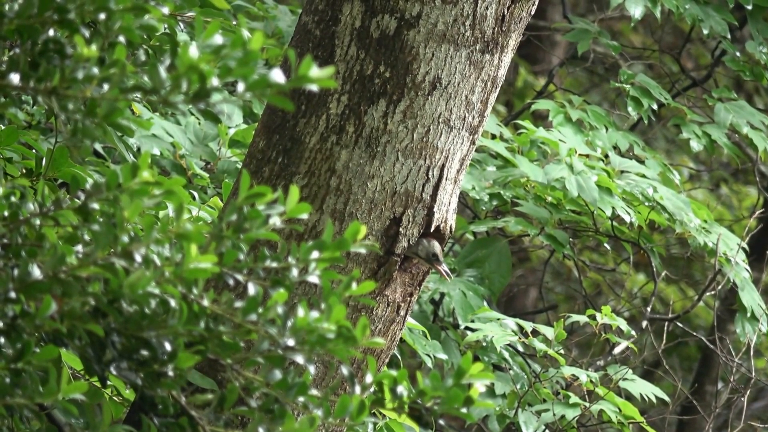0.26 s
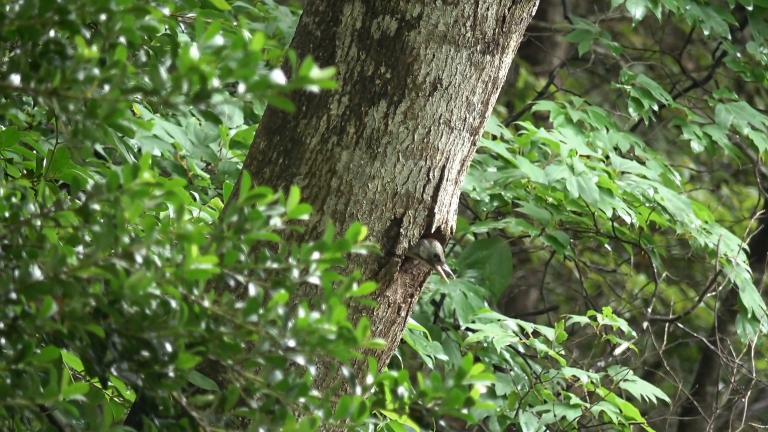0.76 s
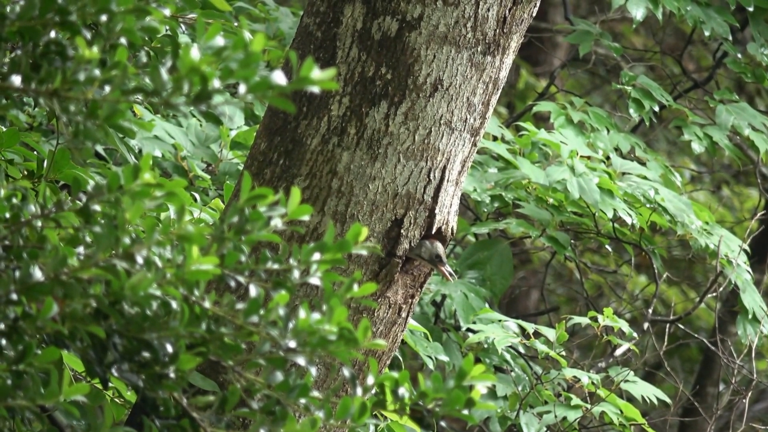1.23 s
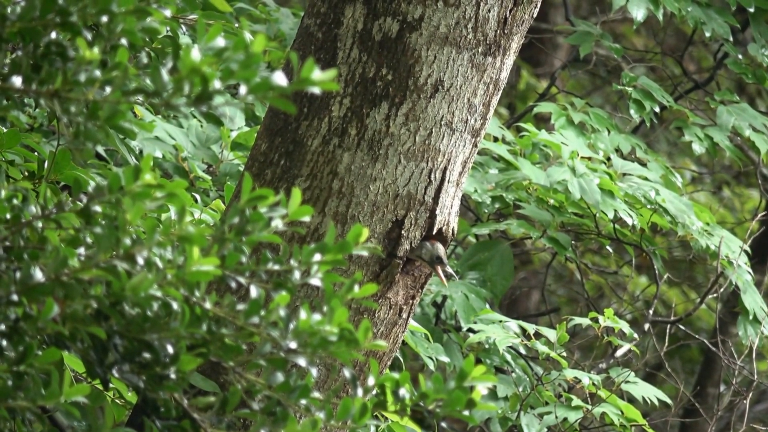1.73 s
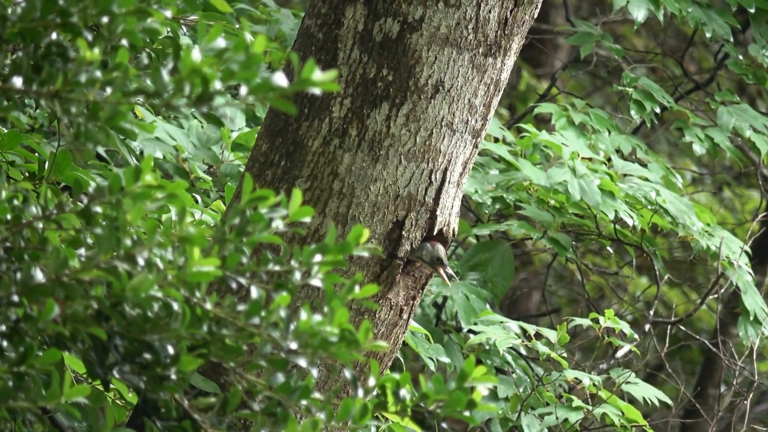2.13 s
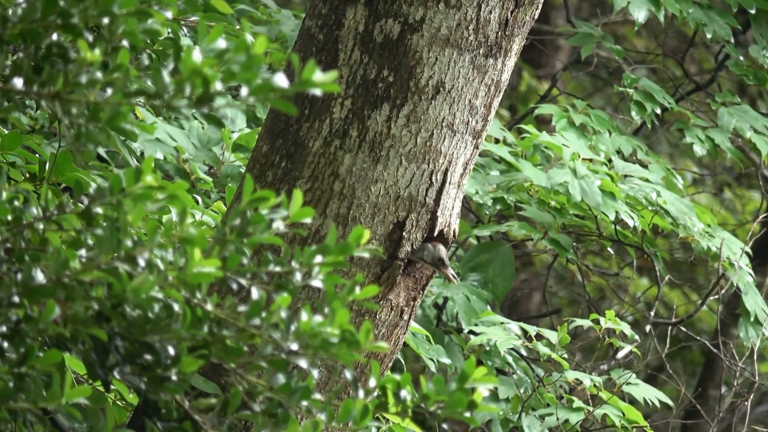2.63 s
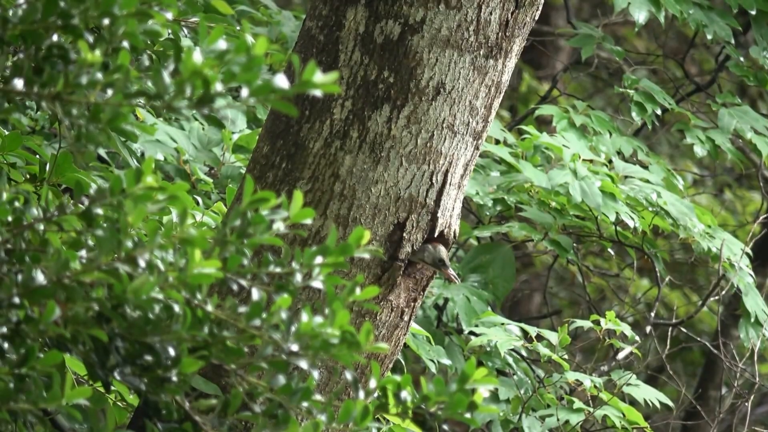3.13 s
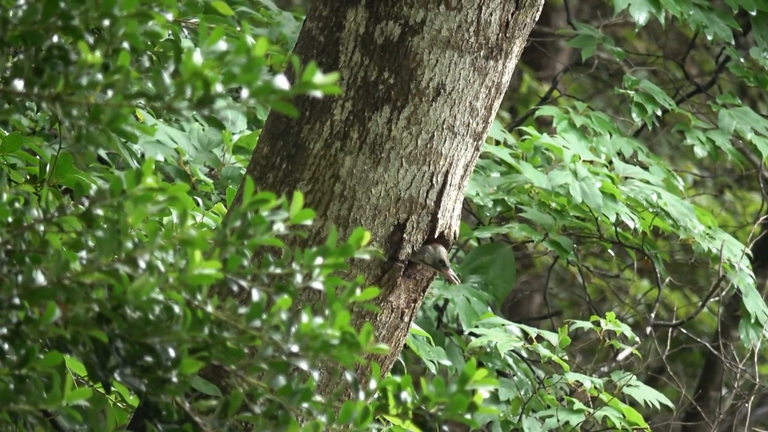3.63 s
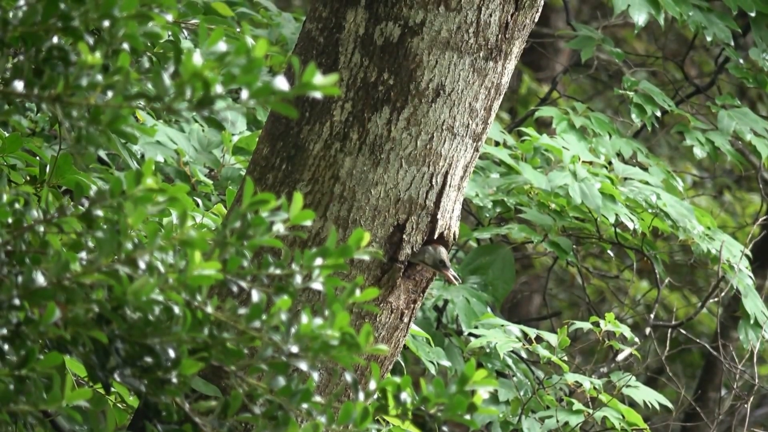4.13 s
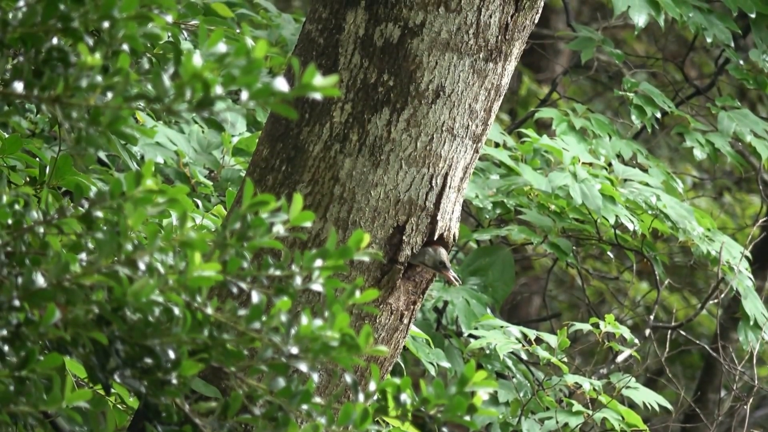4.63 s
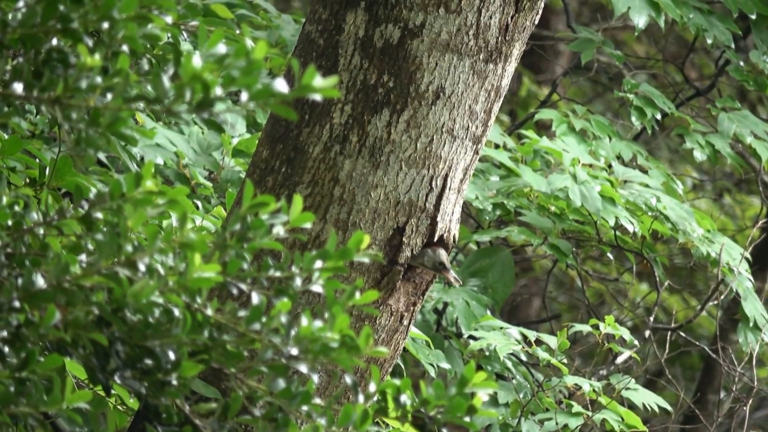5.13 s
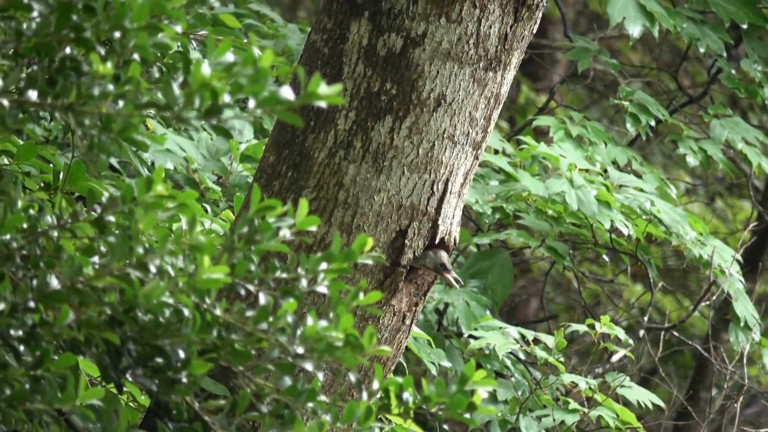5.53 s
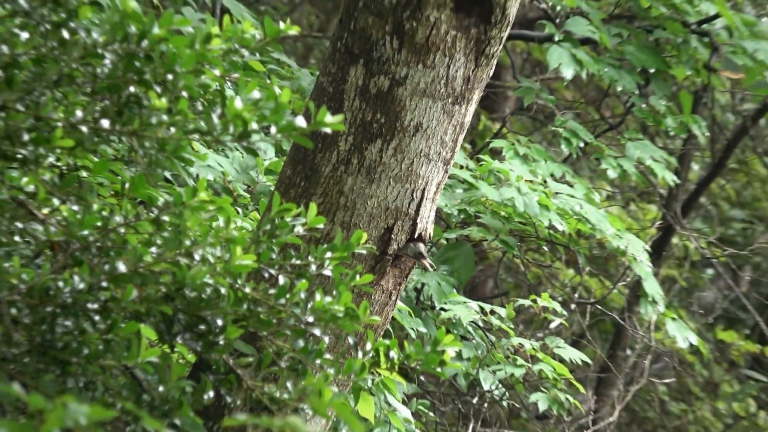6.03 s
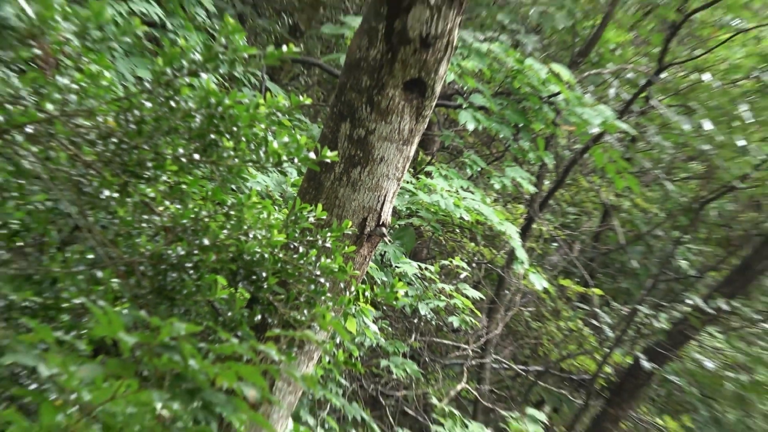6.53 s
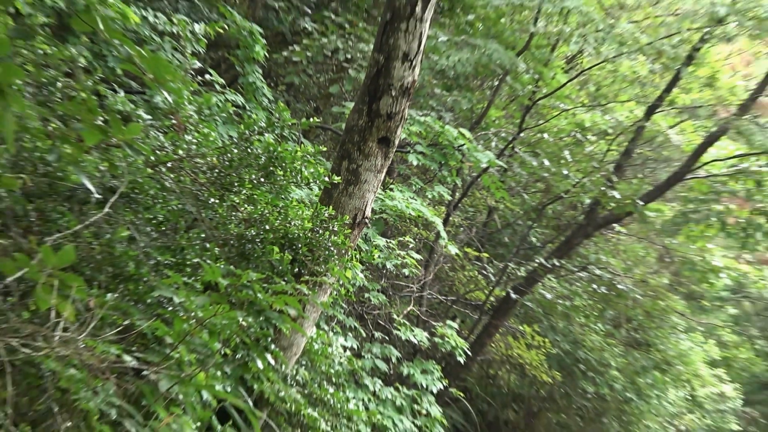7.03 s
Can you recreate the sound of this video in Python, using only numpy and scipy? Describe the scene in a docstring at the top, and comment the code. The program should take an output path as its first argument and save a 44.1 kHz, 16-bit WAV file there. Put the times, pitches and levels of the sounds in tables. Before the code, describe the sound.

Nestling birds keep up a nasal, rasping chatter with soft hisses and faint clucks over quiet forest air, broken once by a sharp pik.

```python
"""A woodpecker nest in a forest, nearly straight ahead of a closely spaced microphone pair.
Over quiet air and a thin far-off whistle, short nasal rasping calls start at once, about three a second,
with soft hisses and faint clucks between them; trunks and leaves scatter every call.
Near 3 s comes one sharp high 'pik'. The calls carry on, joined by soft bumps on the camera body,
two more far whistles and three faint runs of the lens motor."""
import sys
import numpy as np
from scipy import signal
from scipy.fft import rfft, irfft, next_fast_len
from scipy.io import wavfile

SR = 44100
rng = np.random.default_rng(int(sys.argv[2]) if len(sys.argv) > 2 else 0)


def file_out(sig):
    """Save sig as 16-bit WAV at sys.argv[1]."""
    # one column per channel
    cols = np.atleast_2d(sig).T
    # limit, then scale
    lim = np.clip(cols, -1, 1)
    pcm = np.round(lim * 32767).astype(np.int16)
    wavfile.write(sys.argv[1], SR, pcm)


N = 320607
CUTOFF_HZ = 15900
# arch of a call or cluck, before roughness scales it: length_share, pitch_ratio, effort_db
CALL_ARCH = [(0, 0.929, 5), (.1, 0.94, -2.5), (.33, 0.97, 2.5), (.52, 0.98, 4.5), (0.721, .935, -2.5),
             (.86, .82, -3.5), (0.999, .74, -10.5), (1.179, .65, -5.5)]


def from_db(db):
    """Decibels to gain."""
    return 10 ** (np.asarray(db) / 20)


def rms_one(x):
    """Scale to rms 1."""
    return x / np.sqrt(np.mean(x ** 2) + 1e-20)


def at_hz(points, hz, column=1):
    """Read a column of a spectrum on a log-frequency axis."""
    points = np.array(points)
    return np.interp(np.log(np.maximum(hz, 1)), np.log(points[:, 0]), points[:, column])


def along(rows, t):
    """Read every column of a curve at t."""
    first, *columns = np.transpose(rows)
    return [np.interp(t, first, c) for c in columns]


def coloured_noise(colour):
    """Steady noise of a given spectrum, rms 1."""
    size = next_fast_len(N)
    gain = from_db(at_hz(colour, np.fft.rfftfreq(size, 1 / SR)))
    return rms_one(irfft(rfft(rng.standard_normal(size)) * gain, size)[:N])


def flutter(rate_hz, size):
    """Random wavering up to a given rate, rms 1."""
    low = signal.butter(2, min(rate_hz, SR / 4), fs=SR, output="sos")
    return rms_one(signal.sosfilt(low, rng.standard_normal(2 * size))[size:])


def add(track, start_s, sound):
    """Mix a sound into a track at a given time."""
    start = int(start_s * SR)
    track[start:start + len(sound)] += sound[:N - start]


def swells(events, colour):
    """Noise of one colour that rises and falls smoothly at each event."""
    level = np.zeros(N)
    for start_s, length_s, level_db in events:
        add(level, start_s, from_db(level_db) * np.hanning(int(length_s * SR)))
    return level * coloured_noise(colour)


def forest_air(air_db=-56, leaves_db=-67, stir_db=4, stir_hz=7, rumble_trim_db=-1.0):
    """The bed of the place: even hiss, leaves stirring in small fits and a low distant rumble."""
    # spectra of the air, the leaves and the rumble: frequency_hz, gain_db
    air_colour = [(15, -36), (25, -2), (84, 0), (180, -9), (326, -11.5), (796, -8.5), (1160, -2.5),
                  (1890, -5), (3250, -5), (3720, -6.5), (5570, -11), (9070, -31), (12200, -21),
                  (14800, -38), (16000, -53)]
    leaf_colour = [(250, -17), (420, -20), (530, 11.5), (700, -2), (1050, 13.5), (1500, -16), (2200, -3),
                   (3500, -44), (16000, -48)]
    rumble_colour = [(20, -37), (45, -5.5), (75, 0.5), (120, -2.5), (170, -21), (300, -31)]
    # drift of the rumble, before its trim: time_s, level_db
    rumble_drift = [(0.0, -61.5), (0.95, -71), (2.91, -58), (7.11, -63), (7.27, -60)]
    rumble_db, = along(rumble_drift, np.arange(N) / SR)
    leaves = from_db(leaves_db + stir_db * flutter(stir_hz, N)) * coloured_noise(leaf_colour)
    rumble = from_db(rumble_db + rumble_trim_db) * coloured_noise(rumble_colour)
    return from_db(air_db) * coloured_noise(air_colour) + leaves + rumble


def far_whistles():
    """Thin whistles far off: swells of a narrow, high band of noise."""
    # whistles: start_s, length_s, level_db
    whistles = [(0.0, 0.19, -65), (3.96, 0.17, -64), (6.87, 0.21, -72)]
    # their band: frequency_hz, gain_db
    whistle_colour = [(6000, -70), (7300, -12), (7700, -10), (8100, -23), (9500, -70)]
    return swells(whistles, whistle_colour)


def camera_bumps():
    """Soft, dull bumps on the camera body."""
    # bumps: start_s, length_s, level_db
    bumps = [(3.325, 0.042, -57.5), (4.14, 0.057, -51.5), (5.12, .12, -59.5)]
    # their spectrum: frequency_hz, gain_db
    bump_colour = [(40, -18), (130, 7), (300, 5.5), (550, 12), (800, -4), (2000, -35), (16000, -70)]
    return swells(bumps, bump_colour)


def lens_motor(cruise_hz=148.4, settle_s=0.0545, brake_s=0.101, kick_db=9, waver=0.0059):
    """A faint two-partial hum: the motor starts fast and loud, settles, then sags as it brakes."""
    # motor runs: start_s, length_s, fundamental_db, octave_db, overshoot_share, sag_share
    runs = [(4.16, 0.38, -67, -66.5, 0.148, 0.18), (5.62, 0.37, -58.5, -73.5, 0.41, 0.21),
            (6.24, 1, -66, -69, 0.277, 0.0071)]
    out = np.zeros(N)
    for start_s, length_s, fundamental_db, octave_db, overshoot, sag in runs:
        t = np.arange(int(length_s * SR)) / SR
        kick, brake = np.exp(-t / settle_s), np.exp((t - length_s) / brake_s)
        hz = cruise_hz * (1 + overshoot * kick - sag * brake)
        hz *= 1 + waver * flutter(rate_hz=25, size=65536)[:len(t)]
        phase = 2 * np.pi * np.cumsum(hz) / SR
        hum = from_db(fundamental_db + kick_db * kick) * np.sin(phase)
        hum += from_db(octave_db) * np.sin(2 * phase)
        add(out, start_s, np.sqrt(2) * hum * signal.windows.tukey(len(t), .1))
    return out


def through_trees(voice, direct, build_up_s=0.0066, far_db=-23, far_t60_s=1.35):
    """From nest to microphone: direct sound, hard echoes, then leaf scatter with a faint long tail."""
    # echoes off nearby trunks and ground, against the direct sound: delay_s, gain_db
    echoes = [(.0068, -15), (.0125, -13), (.0215, -15), (.044, -14.5)]
    # scatter from the foliage: frequency_hz, gain_db, t60_s
    foliage = [(500, -32, 0.88), (1590, -14, 0.44), (2530, -10, 0.66), (3136, -4, 0.31), (4370, -3, 0.4),
               (8350, -1, 0.42), (16000, -2.5, 0.33)]
    t = np.arange(SR) / SR
    hz = np.fft.rfftfreq(SR, 1 / SR)
    white = rfft(rng.standard_normal(SR)) / np.sqrt(SR)
    centres = np.geomspace(400, 16000, 12)
    far_tail = from_db(far_db) * 1000 ** (-t / far_t60_s)
    build_up = 1 - np.exp(-t / build_up_s)
    response = np.zeros(SR)
    for centre, share in zip(centres, np.eye(len(centres))):
        band = irfft(white * np.interp(np.log(hz + 1), np.log(centres), share), SR)
        t60_s = at_hz(foliage, centre, column=2)
        decay = (1000 ** (-t / t60_s) + far_tail) * build_up
        response += band * rms_one(decay) * from_db(at_hz(foliage, centre))
    response[0] += direct
    for delay_s, gain_db in echoes:
        response[int(delay_s * SR)] += direct * from_db(gain_db)
    return signal.fftconvolve(voice, response)[:N]


def hisses(length_s=0.08):
    """Soft puffs of hiss from the nest, all equally long."""
    # puffs: middle_s, level_db
    puffs = [(.195, -43), (.68, -49.5), (.97, -44.5), (1.245, -42.5), (1.648, -49.5), (2.22, -53),
             (3.316, -46), (3.919, -45.5), (4.633, -48), (5.64, -45.5), (5.956, -43.5), (6.692, -37.5)]
    # their spectrum: frequency_hz, gain_db
    hiss_colour = [(300, -40), (550, 10.5), (720, -6), (1000, 10), (1500, 5), (2250, 9.5), (2800, 6.5),
                   (3800, -5), (4400, 12), (4900, 1), (5750, 11.5), (6700, -3.5), (9000, -18), (16000, -27)]
    return swells([(middle_s - length_s / 2, length_s, db) for middle_s, db in puffs], hiss_colour)


def syrinx(length_s, pitch_hz, rough, arch, colour, fade=0, start_ratio=1, breath=0.03, attack_s=0.0028,
           scoop_s=0.0069, bloom_s=0.00028, wander=0.0054, jitter=0.066, rasp=0.75, size=2600):
    """The bird's voice: harmonics on an arched pitch; rough calls waver from cycle to cycle."""
    t = np.arange(size) / SR
    bend, effort = along(arch, t / length_s)
    # harsh calls are pushed harder in the middle and bend further than clear ones
    effort *= 0.47 + 0.1 * rough
    effort -= fade * (np.minimum(t / length_s, 1) - .35)
    f0 = pitch_hz * bend ** (0.71 + 0.795 * rough)
    f0 *= 1 + (start_ratio - 1) * np.exp(-(t / scoop_s) ** 2)   # slide onto the note
    f0 *= 1 + wander * flutter(rate_hz=110, size=size)
    f0 *= 1 + jitter * rough * flutter(rate_hz=900, size=size)
    phase = 2 * np.pi * np.cumsum(f0) / SR
    out = np.zeros(size)
    for k in range(1, 19):
        # upper harmonics are the first to break up and the first to fade as effort falls
        noisy = np.clip(rasp * rough * k / 4 + breath * k, 0, 1)
        effort_db = effort * (1.11 + 0.097 * min(k, 10))
        shake = (flutter(300, size) + 1j * flutter(300, size)) / np.sqrt(2)
        # the throat delays each harmonic differently
        carrier = np.exp(1j * (k * phase + 2 * np.pi * rng.random()))
        partial = ((np.sqrt(1 - noisy ** 2) + noisy * shake) * carrier).imag
        partial *= 1 - np.exp(-t / (bloom_s * k))   # a smooth start: upper harmonics come in later
        if k * pitch_hz < CUTOFF_HZ:
            out += partial * from_db(colour(k * f0, t) + effort_db)
    onset = np.clip(t / attack_s, 0, 1)
    release = np.clip((arch[-1][0] * length_s - t) / attack_s + 1, 0, 1)
    return np.sqrt(2) * out * onset * release


def clucks(length_s=.012, pitch_hz=850, rough=0.548, echo_s=0.0205, echo_db=-4):
    """Faint, hoarse blips of the voice, each followed by a quick echo."""
    # clucks: start_s, gain_db
    events = [(1.903, -36.5), (2.2713, -37), (2.657, -41), (4.215, -35.5), (4.898, -37.5), (6.2551, -40)]
    # their spectrum: frequency_hz, gain_db
    cluck_colour = [(400, -31), (850, -11), (1700, -8.5), (2500, -2.5), (3400, -14), (3800, -13),
                    (4400, -3.5), (5700, -2.5), (7200, -13.5), (9000, -25.5), (12000, -20.5), (16000, -34)]
    colour = lambda hz, t: at_hz(cluck_colour, hz)
    out = np.zeros(N)
    for start_s, gain_db in events:
        for delay_s, drop_db in ((0, 0), (echo_s, echo_db)):
            blip = syrinx(length_s, pitch_hz, rough, CALL_ARCH, colour, attack_s=0.0059)
            add(out, start_s + delay_s, from_db(gain_db + drop_db) * blip)
    return out


def pik():
    """One sharp, clear high note that steps down at its end."""
    # the note: start_s, length_s, pitch_hz, roughness_share
    note = (3.113, .032, 2512, 0.027)
    # its arch, before roughness scales it: length_share, pitch_ratio, effort_db
    pik_arch = [(0, 0.99, -8), (.2, 0.89, -14), (.35, 1, 2.5), (.53, 1.0, 15.5), (.64, .95, -10),
                (.76, .85, -13), (1.0, 0.78, -30)]
    # its spectrum: frequency_hz, gain_db
    pik_colour = [(2100, -17), (2500, -35), (4300, -24.5), (5000, -31.5), (6500, -35.5), (7500, -45),
                  (10000, -51.5), (12500, -65), (16000, -74)]
    start_s, length_s, pitch_hz, rough = note
    colour = lambda hz, t: at_hz(pik_colour, hz)
    out = np.zeros(N)
    add(out, start_s, syrinx(length_s, pitch_hz, rough, pik_arch, colour, breath=.008))
    return out


def throat_dips(voice):
    """The throat's anti-resonances cut narrow valleys that stay put while the pitch moves."""
    # anti-resonances: centre_hz, width_hz, depth_db
    notches = [(3723, 480, -22), (8660, 250, -4.5)]
    for centre_hz, width_hz, depth_db in notches:
        notch = signal.iirnotch(centre_hz, centre_hz / width_hz, fs=SR)
        floor = from_db(depth_db)
        voice = floor * voice + (1 - floor) * signal.lfilter(*notch, voice + 1e-18)
    return voice


def nasal_calls(usual_hz=849.9, usual_rough=0.26, beak_opening_s=0.0057, pose_count=3):
    """The beak opens as each call begins and strain sets its colour; one track per pose of the head."""
    # calls at the nest: start_s, length_s, pitch_hz, gain_db, roughness_share, effort_fade
    calls = [(0.213, 0.031, 841.3, -26.5, 0.03, 0.5), (0.3923, 0.023, 867, -27, 0.24, 4.5),
             (0.8245, 0.041, 852, -30.5, 0.29, 3.5), (1.1024, 0.034, 845, -30.5, .54, -3.5),
             (1.3213, 0.025, 845, -30.5, 0.58, 0.5), (1.7888, 0.039, 847, -30.5, 0.28, 3.5),
             (1.985, 0.024, 867, -29, .36, 1), (2.522, 0.03, 864, -27, 0.25, 0),
             (2.8574, 0.03, 869.5, -27, 0.41, 1.5), (3.5236, 0.051, 833, -30, 0.09, 8.5),
             (3.7287, 0.023, 875, -27, 0.46, 2.5), (4.1158, .039, 850.5, -27, 0.1, 2.5),
             (4.3901, .035, 834, -27.5, 0.35, 5), (4.6708, 0.028, 824, -29, 0.01, 3),
             (5.0684, .033, 843.5, -27.5, 0.1, 0.5), (5.2757, 0.034, 854, -31, 0.63, -4),
             (5.6973, .028, 855.6, -29.5, 0.26, 3.5), (5.9967, 0.03, 859, -33.5, .4, 0),
             (6.4406, 0.04, 834, -31.5, 0, 4.5), (6.6804, 0.032, 880, -44.5, 0.72, 1),
             (7.0423, 0.041, 848, -30, 0.28, 4.5)]
    # filtering by the throat and by a half-shut beak: frequency_hz, gain_db
    throat = [(550, -51), (830, -20.5), (1250, -3.5), (1650, 1.5), (2000, 0.5), (2500, 1.5), (3300, 0),
              (3750, -8.5), (4300, -11.5), (5800, -6.5), (7000, -12.5), (8100, -10.5), (9300, -22),
              (12000, -22), (16000, -34)]
    half_shut_beak = [(1600, 2.5), (2300, -45), (2600, -17), (3050, 9), (3400, -1.5), (4500, -12),
                      (12000, 2.5)]
    # registers, whose weight moves upward with strain: frequency_hz, usual_db, per_strain_db
    registers = [(1650, -8, 1), (2494, 1.5, -2), (3295, 6, 2.2), (4540, -1.4, 0.86)]
    poses = np.zeros((pose_count, N))
    for i, (start_s, length_s, pitch_hz, gain_db, rough, fade) in enumerate(calls):
        # a high or harsh call is a strained one; the usual call has strain 0
        strain = 23 * np.log2(pitch_hz / usual_hz) + 3.6 * (rough - usual_rough)
        register = [(hz, usual_db + strain * shift_db) for hz, usual_db, shift_db in registers]

        def colour(hz, t):
            """Gain in dB of throat, register and opening beak."""
            shut = np.exp(-(t / beak_opening_s) ** 2)
            return at_hz(throat, hz) + at_hz(register, hz) + at_hz(half_shut_beak, hz) * shut

        # an easy call slides up onto its note, a strained one starts nearer to it
        start_ratio = 0.97 + 0.0342 * strain
        call = syrinx(length_s, pitch_hz, rough, CALL_ARCH, colour, fade, start_ratio, attack_s=0.0031)
        add(poses[i % pose_count], start_s, from_db(gain_db) * call)
    return throat_dips(poses)


def scene():
    """The nest is nearly straight ahead; the close pair hears little difference between its sides."""
    # stereo width of the microphone pair: frequency_hz, side_gain_db
    width = [(30, -35), (250, -4.5), (600, -13.5), (1200, -26.5), (3200, -31.5), (5500, -14), (8000, -8.5),
             (10500, -5), (12500, -47)]
    # each pose of the head sends the sound along other paths through the leaves
    voices = [*nasal_calls(), pik() + clucks() + hisses()]
    mid = sum(through_trees(voice, direct=0.87) for voice in voices) + forest_air()
    mid += far_whistles() + lens_motor() + camera_bumps()
    side = sum(through_trees(voice, direct=0.65) for voice in voices) + forest_air()
    side_gain = from_db(at_hz(width, np.fft.rfftfreq(N, 1 / SR)))
    side = irfft(rfft(side) * side_gain, N)
    return np.array([mid + side, mid - side])


def record(dry):
    """A steep low-pass cuts the highest treble."""
    return signal.sosfilt(signal.ellip(10, .2, 70, CUTOFF_HZ, fs=SR, output="sos"), dry)


dry = scene()
out = record(dry)
file_out(out)
```